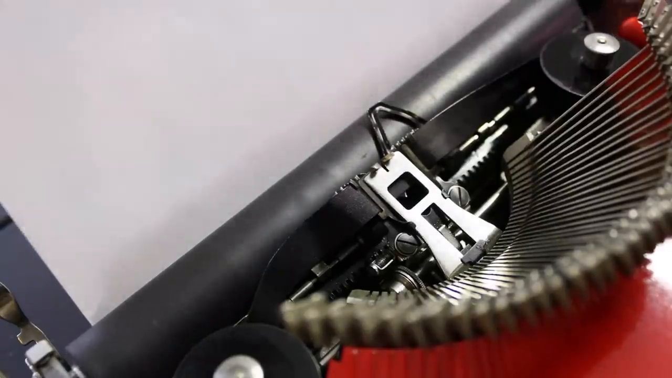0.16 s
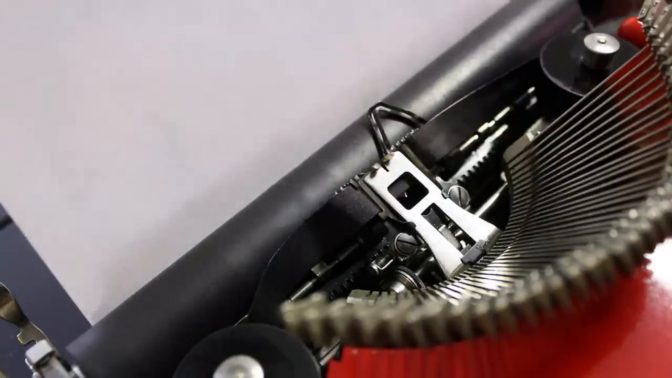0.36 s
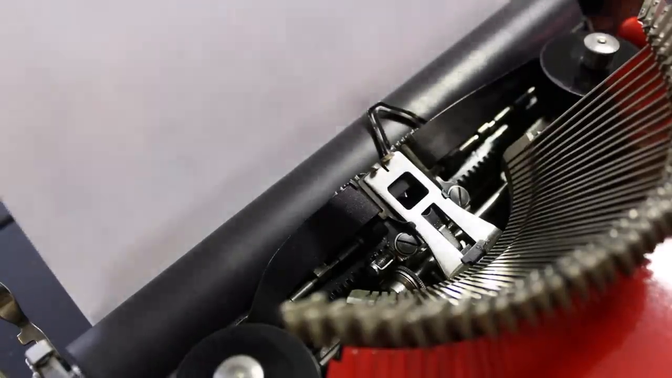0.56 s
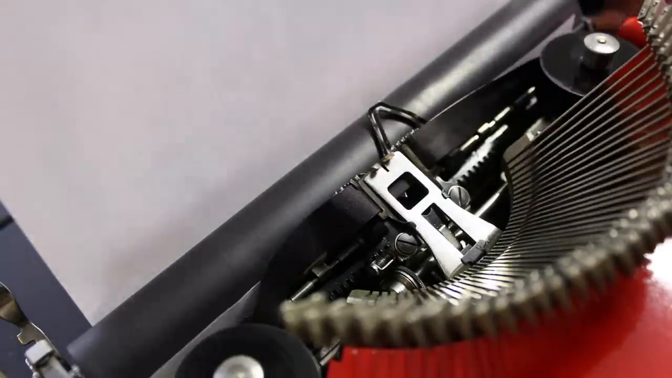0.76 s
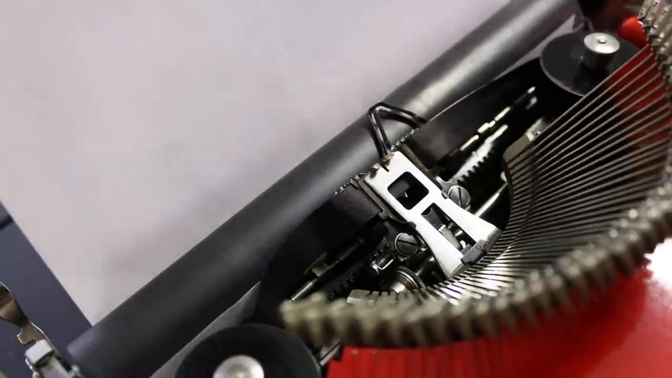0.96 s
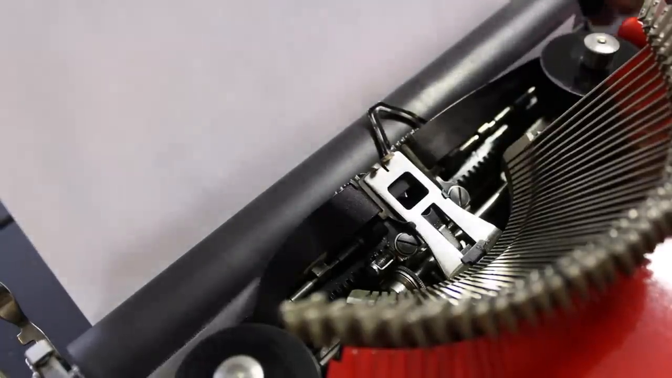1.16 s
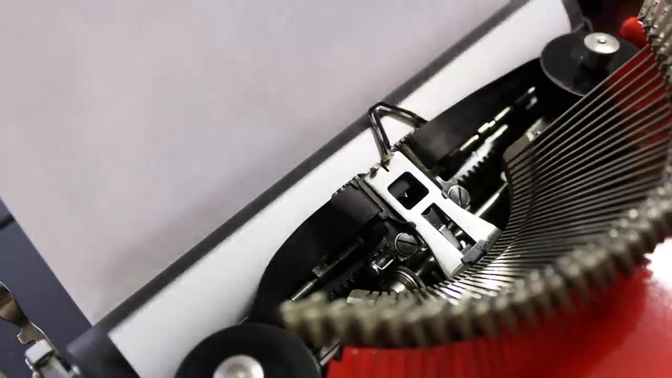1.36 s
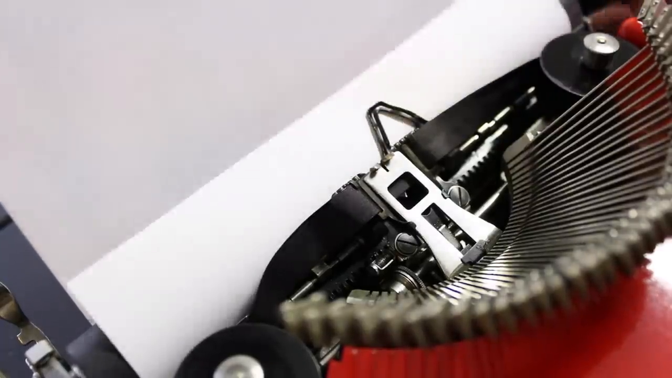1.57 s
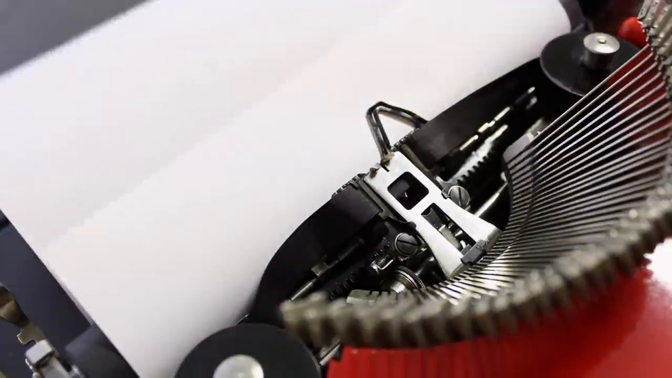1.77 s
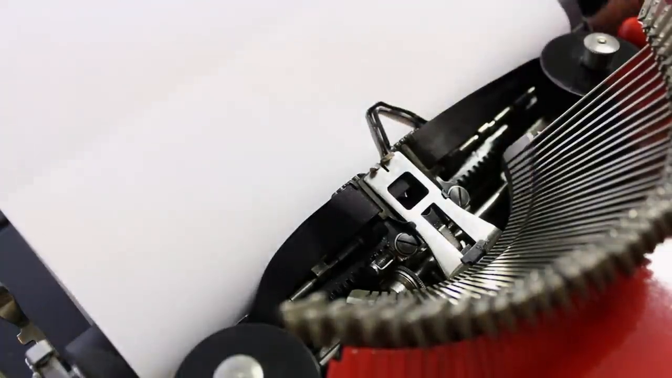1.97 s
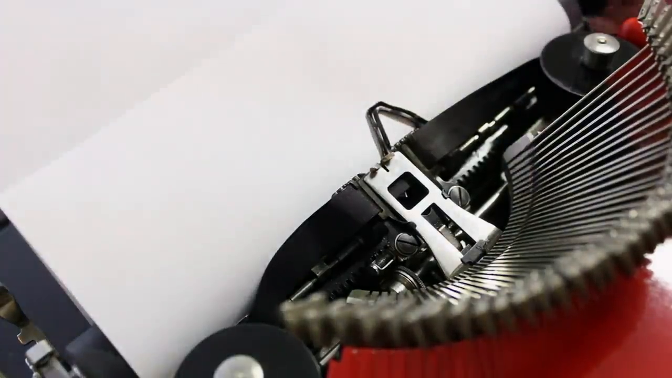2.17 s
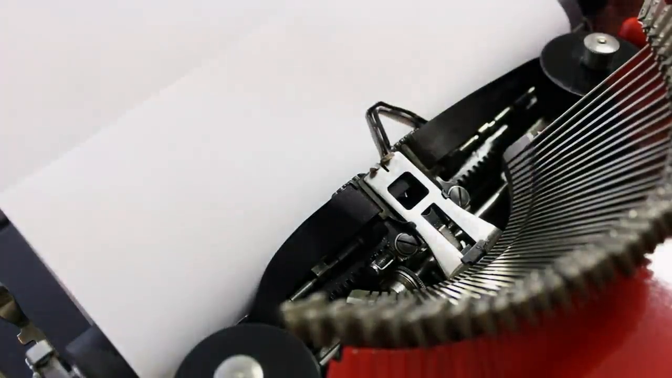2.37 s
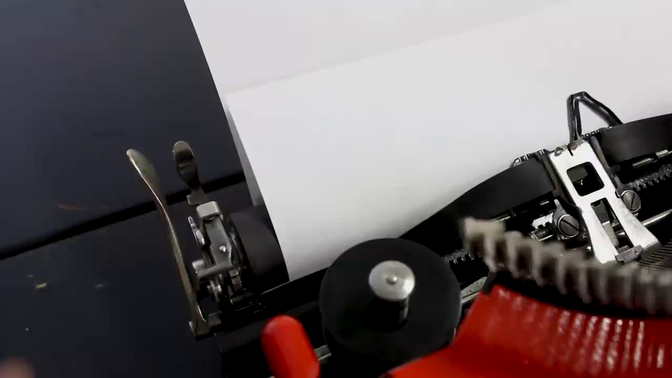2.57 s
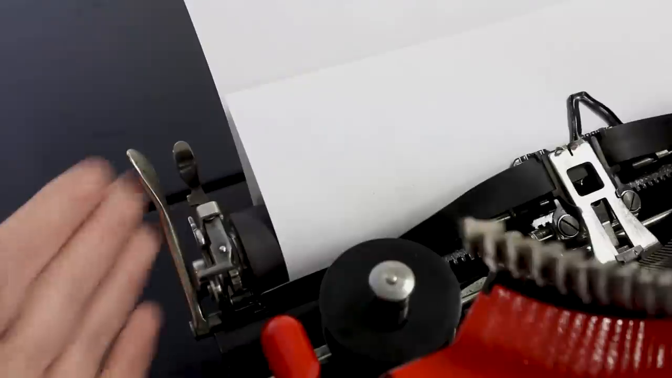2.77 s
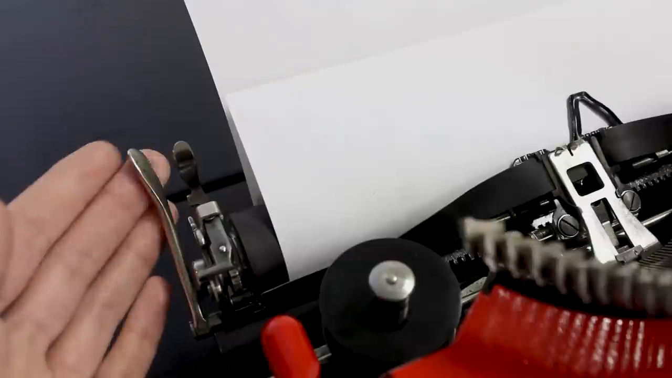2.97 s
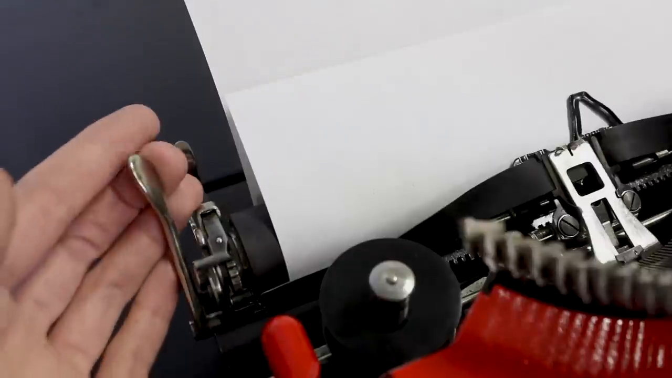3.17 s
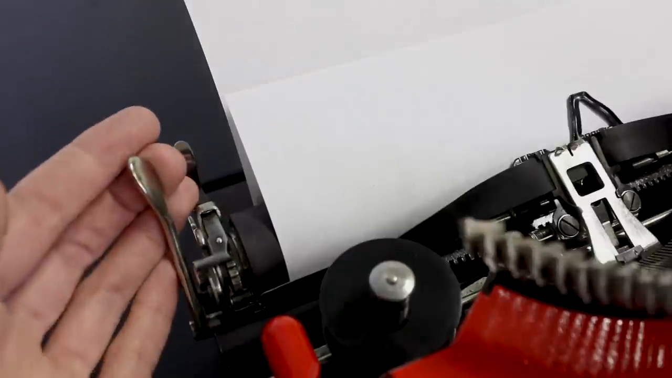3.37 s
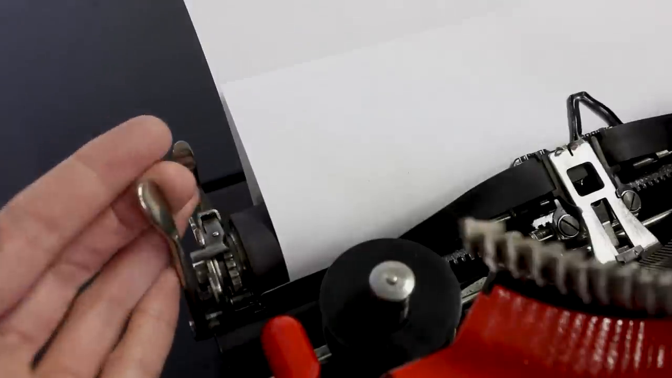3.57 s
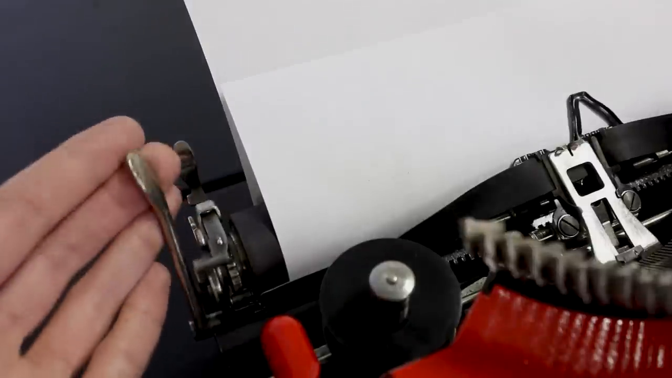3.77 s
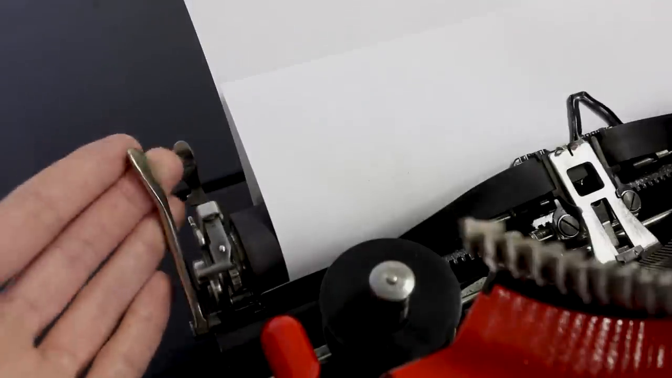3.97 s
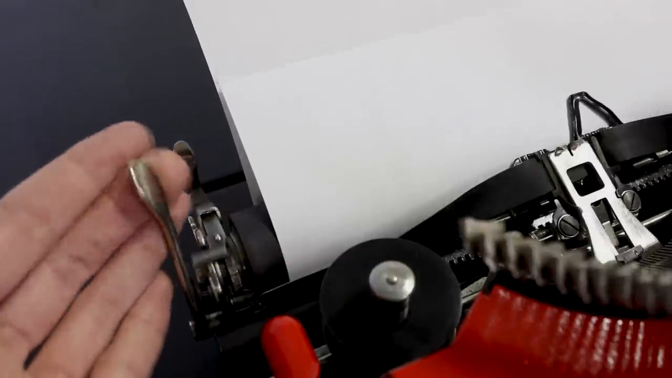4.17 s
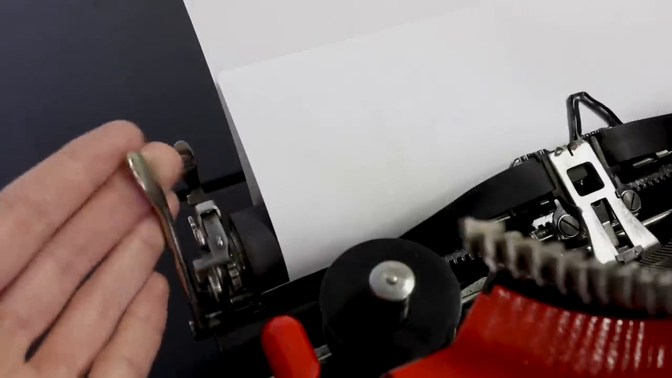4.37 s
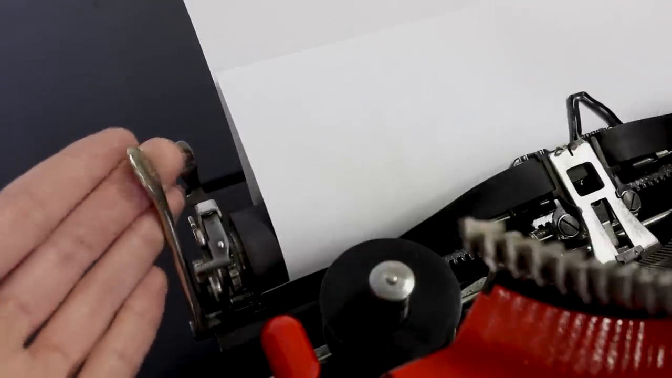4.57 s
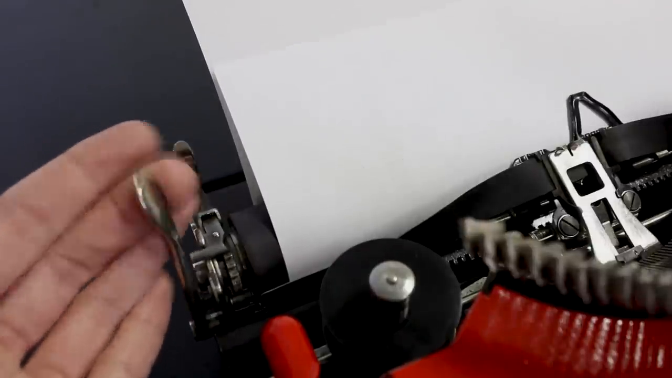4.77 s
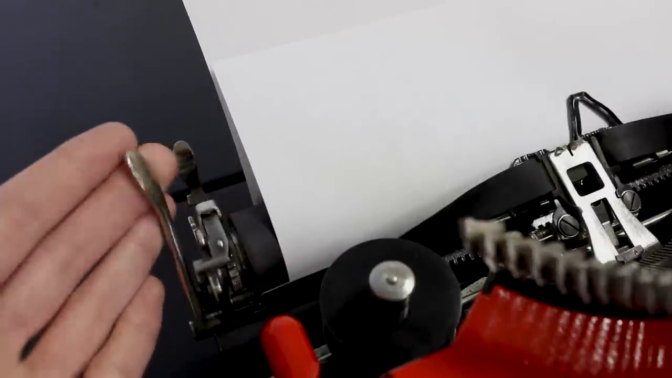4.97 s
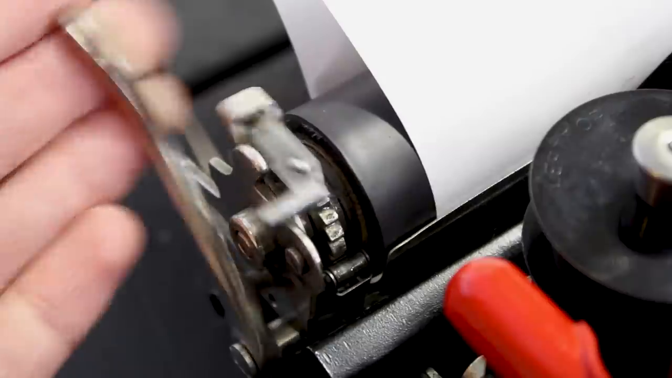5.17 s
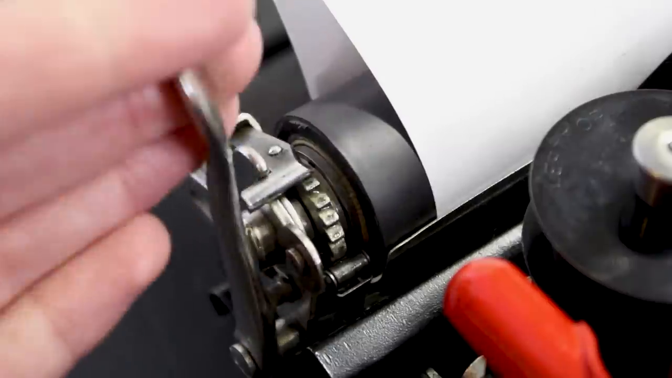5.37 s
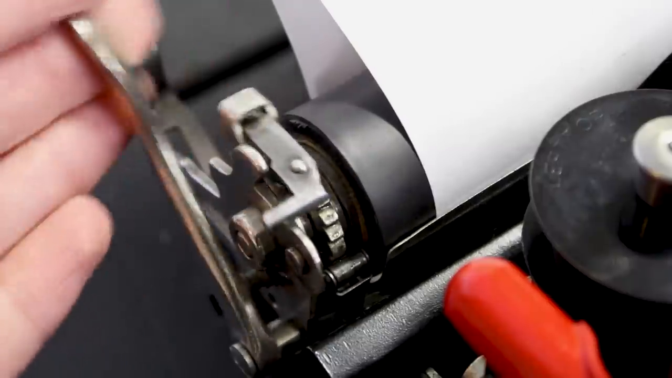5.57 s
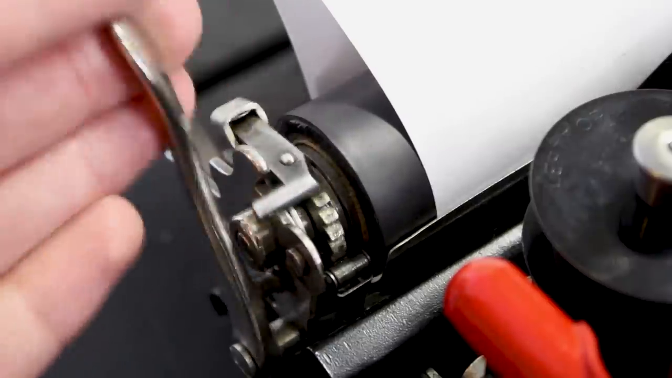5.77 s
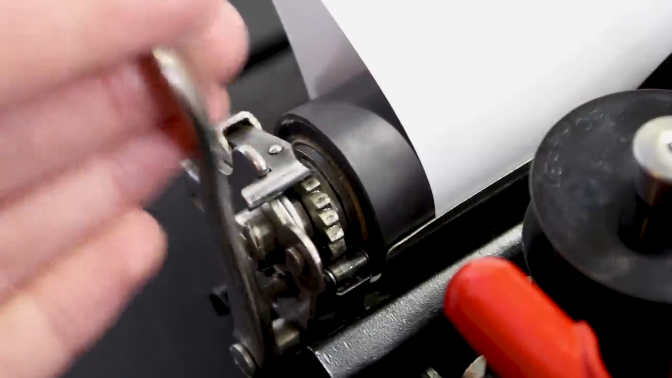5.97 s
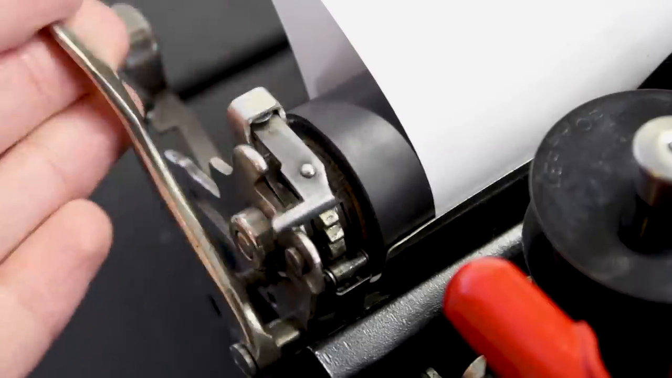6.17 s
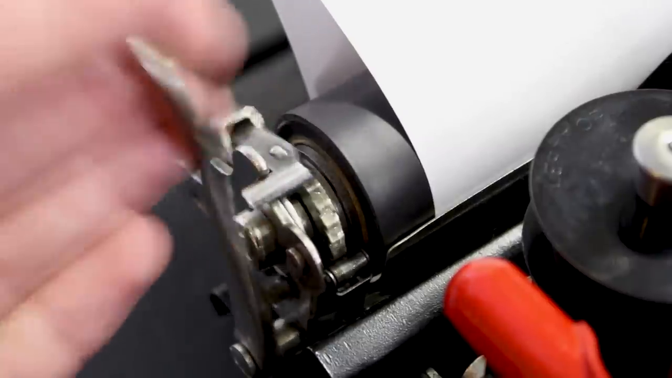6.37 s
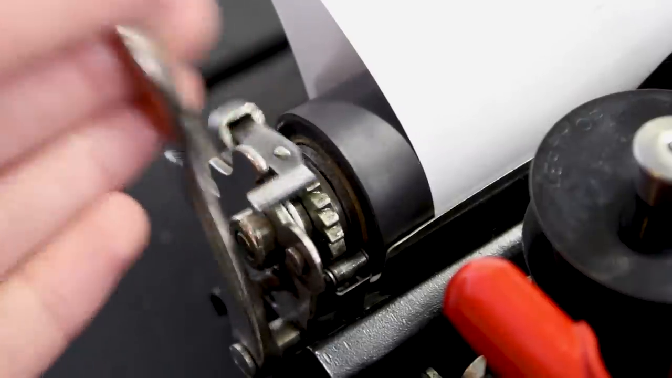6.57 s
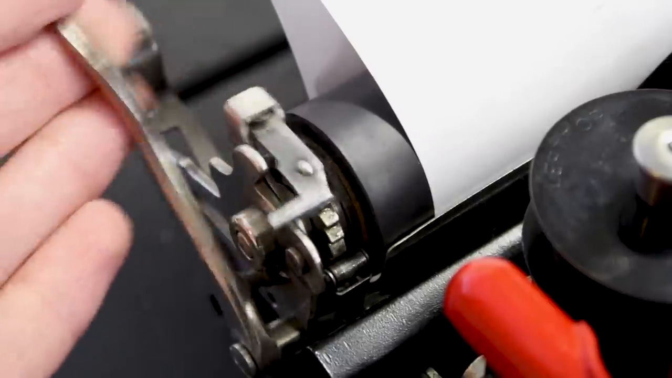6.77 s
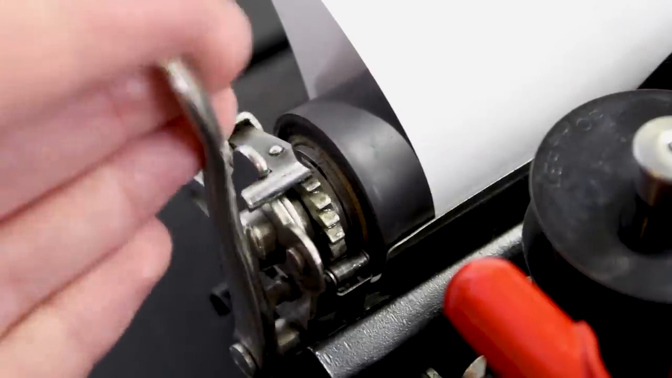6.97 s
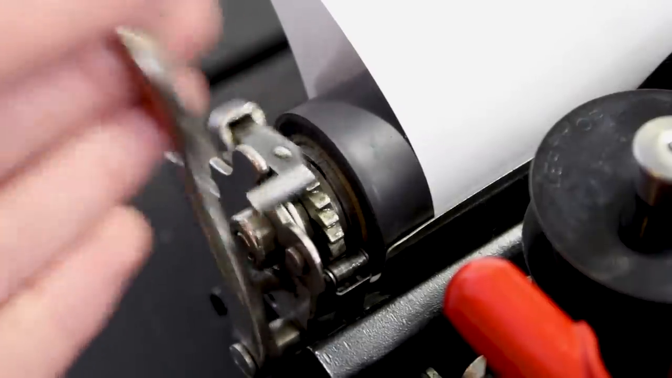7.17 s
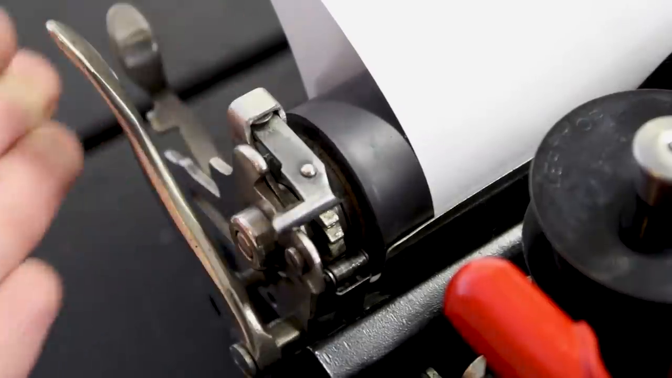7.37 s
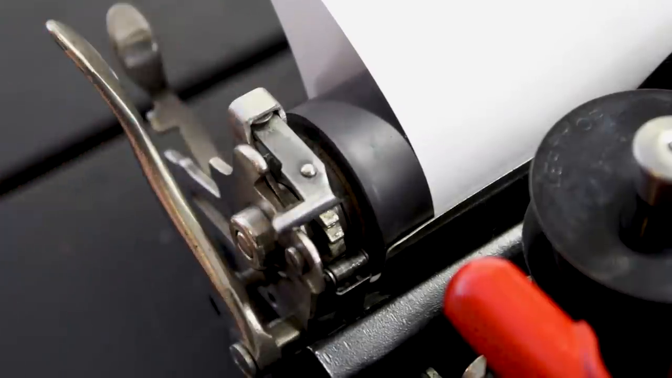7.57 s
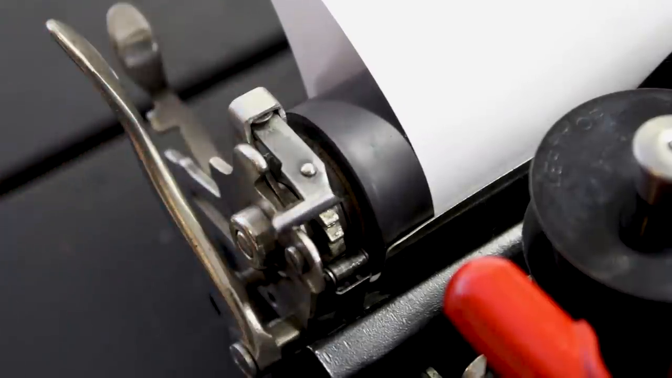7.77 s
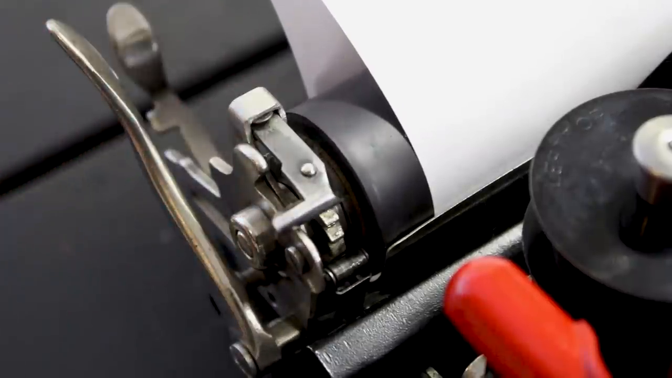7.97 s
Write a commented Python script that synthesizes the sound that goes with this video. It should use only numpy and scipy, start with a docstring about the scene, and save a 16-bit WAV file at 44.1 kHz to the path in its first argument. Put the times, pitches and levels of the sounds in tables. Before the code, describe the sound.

In a small quiet room, close to one microphone, a paper sheet rasps around a typewriter's rubber roller in short turns, with ratchet teeth clicking in quick bursts. After a brief lull, a hand works the line-space lever seven times: a sharp double-edged click, a dull stop, then a bright snap on release. A soft brush of skin ends it.

```python
"""Paper and line-space lever on a portable typewriter

A small quiet room with a faint high whine, one microphone: a sheet rasps in under the feed rollers and
drags round the platen while the ratchet clicks over its teeth. Then a hand works the line-space lever:
the pawl snaps, the platen turns a notch, the lever springs back; a hand brushes away at the end.
Contacts ring damped frame modes, jolts swell slow desk and case modes, paper is grainy shaped noise."""
import sys
import numpy as np
from scipy import signal
from scipy.fft import irfft
from scipy.io import wavfile

SR = 44100
rng = np.random.default_rng(int(sys.argv[2]) if len(sys.argv) > 2 else 0)


def master_out(mix):
    """Clip the mix to full scale and print it as 16-bit PCM to the path in sys.argv[1]."""
    frames = np.transpose(np.atleast_2d(mix))
    ceiling = np.clip(frames, -1, 1)
    pcm = np.round(ceiling * 32767).astype(np.int16)
    wavfile.write(sys.argv[1], SR, pcm)


N = 354123   # length [samples]


def amp(db):
    """Decibels to gain."""
    return 10 ** (np.asarray(db) / 20)


def rms_one(x):
    """Scale to unit rms."""
    return x / np.sqrt(np.mean(x ** 2) + 1e-20)


def in_time(rows):
    """Columns of a curve table, drawn as straight lines with one value a sample."""
    s, *columns = np.transpose(rows)
    return [np.interp(np.arange(N) / SR, s, column) for column in columns]


def add(out, s, x):
    """Mix a short sound in at a time, cropped to the scene."""
    i = round(s * SR)
    x = x[max(-i, 0):N - i]
    start = max(i, 0)
    out[start:start + len(x)] += x


def grainy(spectrum, grains_per_s, spread_db, share):
    """Noise plus a power share of random slip grains, shaped by a spectrum; rms 1."""
    born = rng.random(N) < grains_per_s / SR
    size_db = spread_db * np.minimum(rng.exponential(1, N), 4)
    grains = born * amp(size_db) * rng.choice([-1, 1], N)
    share = np.clip(share, 0, 1)
    raw = np.sqrt(1 - share) * rng.standard_normal(N) + np.sqrt(share) * rms_one(grains)
    hz, level_db = np.transpose(spectrum)
    bins_hz = np.maximum(np.arange(2049) * SR / 4096, 1)
    shape = amp(np.interp(np.log(bins_hz), np.log(hz), level_db, left=-90, right=-90))
    taps = np.roll(irfft(shape), 2048) * np.hanning(4096)
    return rms_one(signal.fftconvolve(raw, taps, "same"))


def fading(s, level_db, fade_s, before=False):
    """Gain that jumps at each time and fades away exponentially, or grows up to it."""
    jumps = np.zeros(N)
    np.add.at(jumps, (s * SR).astype(int), amp(level_db))
    step = -1 if before else 1   # growth is a fade run backwards
    return signal.lfilter([1], [1, -np.exp(-1 / (fade_s * SR))], jumps[::step] + 1e-18)[::step]


def swells(times, levels_db, modes, scatter_db):
    """Each jolt makes slow modes swell and die away."""
    out, t = np.zeros(N), np.arange(round(0.4 * SR)) / SR
    chance = rng.standard_normal((len(times), len(modes), 2))
    for s, jolt_db, draws in zip(times, levels_db, chance):
        for (hz, mode_db, swell_s), (phase, uneven) in zip(modes, draws):
            shape = (t / swell_s * np.exp(1 - t / swell_s)) ** 2   # peaks at swell_s
            level_db = jolt_db + mode_db + scatter_db * uneven
            add(out, s, amp(level_db) * shape * np.sin(2 * np.pi * (hz * t + phase)))
    return out


# room tone at the microphone: (frequency [Hz], relative density [dB per Hz])
AIR_SPECTRUM = [(15, -13), (25, 13), (108, -22), (161, -3), (416, -8), (451, -9.5), (531, 9), (734, -15),
                (1260, -2), (6380, -45), (7920, -46), (8590, -26), (12500, -36), (16000, -94)]


def air():
    """Room tone: even shaped noise without grains."""
    return amp(-69.5) * grainy(AIR_SPECTRUM, 100.0, spread_db=0, share=0)


# faint whine in the room: (time [s], level [dB rms])
WHINE_LEVEL = [(0, -85), (.4, -82), (.8, -69), (1.25, -72.5), (2.3, -77), (2.9, -78), (3.5, -72), (5, -115),
               (5.3, -87), (7.5, -102), (8.03, -86)]


def whine():
    """A thin tone of steady pitch high above the room noise, its level drifting."""
    level_db, = in_time(WHINE_LEVEL)
    return np.sqrt(2) * amp(level_db) * np.sin(2 * np.pi * 7840 * np.arange(N) / SR)


# Contacts at the machine, all levels relative:
# (time [s], peak [dB], dull body [dB], clack [dB], jolt into the desk [dB])
# the ratchet clicks over its teeth
TEETH_CONTACTS = [(0.0034, -38, -40, -32, -44.5), (0.0442, -19.5, -27, -36, -44),
                  (0.4834, -17.5, -31, -60, -49), (0.5342, -49, -38, -31, -64),
                  (0.5533, -13, -40, -39, -63), (0.563, -21, -37, -35, -58),
                  (0.6365, -18.5, -30.5, -24, -59), (0.6865, -16.5, -29, -20, -49),
                  (0.7004, -20, -32, -26, -44.5), (0.7421, -11.5, -40, -53, -51),
                  (1.2886, -15, -25, -38, -44.5), (1.3605, -13.5, -26, -28, -46),
                  (1.426, -19, -24.5, -22, -46), (1.5084, -16, -26.5, -23, -41.5),
                  (1.564, -15, -24, -9, -38.5), (1.6148, -10.5, -23, -57, -41),
                  (1.6425, -10.5, -16, -53, -35.5), (1.707, -18.5, -29, -64, -46),
                  (1.767, -10, -15.5, -34, -47), (1.8036, -12.5, -16, -30, -42),
                  (1.943, -10, -20.5, -30, -43.5), (1.9848, -10, -14.5, -19, -48),
                  (2.0079, -8.5, -16, -31, -38), (2.0293, -12.5, -17.5, -41, -41),
                  (2.0637, -18, -13, -23, -56)]
# light ticks of slack parts and fingers
TICK_CONTACTS = [(0.2035, -61, -36.5, -65, -60), (0.2398, -43, -43, -56, -56),
                 (0.2741, -59, -30.5, -41, -63), (0.2881, -53, -46, -53, -60), (0.315, -46, -48, -57, -74),
                 (0.4266, -28.5, -44, -60, -65), (1.2288, -47, -51, -39, -63), (1.257, -29, -54, -37, -64),
                 (2.3498, -46, -50, -65, -77), (2.498, -54, -51.5, -42, -73), (3.786, -39, -64, -61, -68),
                 (3.7983, -35.5, -46, -45, -81), (3.8222, -35.5, -50, -44, -82),
                 (3.9763, -41.5, -43, -45, -58), (4.0657, -30, -36, -53, -70),
                 (4.0718, -35, -30.5, -50, -63), (4.3976, -36, -62, -55, -66), (4.4298, -42, -48, -42, -78),
                 (4.647, -31, -36.5, -42, -74), (4.6559, -27.5, -33.5, -34, -57),
                 (4.98, -44, -50, -53, -69), (5.0164, -41, -55, -39, -74), (5.064, -43, -39, -43, -74),
                 (5.133, -24, -44.5, -42, -57), (5.557, -39.5, -53, -55, -70), (5.5692, -37, -44, -47, -66),
                 (6.068, -36, -45, -52, -67), (6.0955, -35, -45, -35, -72), (6.209, -41, -42.5, -59, -61),
                 (6.623, -39, -46, -70, -69), (6.6562, -39, -45, -41, -70), (6.7956, -51, -50, -69, -64),
                 (7.2234, -41, -52, -56, -76), (7.2406, -42, -50, -55, -80), (7.2585, -37, -48, -45, -66),
                 (7.3325, -13, -32.5, -43, -50.5)]
# the hand bumps case and desk
BUMP_CONTACTS = [(2.9265, -53, -55, -61, -46), (7.734, -29, -45, -54, -44), (7.7508, -35, -45.5, -52, -45)]
# the pushed lever's pawl first grazes a tooth
GRAZE_CONTACTS = [(3.2035, -13.5, -30, -31, -62), (4.1089, -10, -25, -27, -48),
                  (4.6729, -13, -27, -26, -53), (5.2672, -16, -24, -35, -48),
                  (5.8024, -16, -27.5, -14, -43), (6.3234, -12, -29, -26, -44), (6.895, -17, -29, -16, -55)]
# the pushed lever's pawl catches a tooth
CATCH_CONTACTS = [(3.235, -15.5, -29, -23.5, -49), (4.119, -13, -28.5, -32, -47.5),
                  (4.6859, -12.5, -31, -34, -49), (5.2798, -6, -20.5, -34, -41),
                  (5.8135, -10, -28.5, -10, -47.5), (6.3303, -10, -26, -26, -42),
                  (6.9047, -12, -28, -21, -41.5)]
# the platen has turned and the lever meets its stop
STOP_CONTACTS = [(3.5895, -14, -24.5, -40, -43), (4.2781, -17, -26, -52, -45),
                 (4.8565, -16, -23.5, -11.5, -39.5), (5.3513, -17, -18, -38, -40),
                 (5.894, -16.5, -22, -27.5, -41.5), (6.4601, -20.5, -28.5, -27, -42.5),
                 (7.042, -14.5, -25.5, -37, -41.5)]
# the released pawl snaps back
SNAP_CONTACTS = [(3.8594, -9.5, -37, -35, -65), (4.4606, -11, -38, -50, -66),
                 (5.0516, -10, -41.5, -52, -76), (5.623, -9, -34.5, -13, -70.5),
                 (6.1245, -10.5, -38, -42, -64.5), (6.687, -11, -35, -29, -67),
                 (7.2826, -5.5, -31, -41, -63)]
# how each kind touches, rows teeth, grazes, catches, stops, snaps, bumps, ticks:
# (0.6 kHz [dB over body], 1 kHz [dB over body], 2 kHz [dB over clack], 3.5 kHz [dB over peak],
#  7 kHz [dB over peak], scrape before it [dB], scrape length [s], chatter length [s])
KIND_TOUCH = [(-2.5, 2.5, -6.5, -13.5, -11, -18, 0.01, 0.004), (-9, -8, -23, -16.5, -20, -19, .009, .004),
              (-2, 0.5, 19.5, -16.5, -17, -22.5, 0.0054, 0.0046),
              (-39, -0.5, 14, -12, -11, -20, 0.0075, 0.0035),
              (-7, -4, 4.5, -17, -12.5, -25, 0.0088, 0.0034), (-6, 0, -2, -21, -13, -25, 0.013, .0043),
              (-4, -1, -13, -14, -19.5, -24.5, 0.0092, 0.0041)]
# what each kind sets off, same rows:
# (desk thump [dB over jolt], case hum [dB over jolt], rumble [dB over jolt], hollow knock [dB over body],
#  drag [dB over body], rustle after [dB over peak], rustle before [dB over peak])
KIND_SETS_OFF = [(1, -4.5, -46, -47, -29, -69, -55), (0.5, -8.5, -31.5, -19.5, -43, -49, -46),
                 (4, -7, -20.5, -7.5, -40, -44, -51), (2.5, -3.5, -11, -13.5, -20.5, -36.5, -17.5),
                 (3, 2.5, -12, -8, -27.5, -37.5, -56.5), (4, -14.5, -9.5, -1, -18, -37, -38),
                 (3, -6.5, -15.5, -9, -26.5, -29.5, -43.5)]


def each_contact():
    """Contact rows joined with the rules of their kind: (row, touch, sets off)."""
    tables = [TEETH_CONTACTS, GRAZE_CONTACTS, CATCH_CONTACTS, STOP_CONTACTS,
              SNAP_CONTACTS, BUMP_CONTACTS, TICK_CONTACTS]
    kinds = zip(tables, KIND_TOUCH, KIND_SETS_OFF)
    return [(row, touch, sets_off) for rows, touch, sets_off in kinds for row in rows]


def set_off():
    """Times, and the dB of thump, hum, rumble, knock, drag, rustle after and rustle before each contact."""
    rows = []
    for (s, peak_db, body_db, _, jolt_db), _, sets_off in each_contact():
        causes_db = np.repeat([jolt_db, body_db, peak_db], [3, 2, 2])
        rows.append((s, *(causes_db + sets_off)))
    return np.transpose(rows)


# spectra of sliding paper and shaken machine: (frequency [Hz], relative density [dB per Hz])
DRAG_SPECTRUM = [(180, -57), (300, -27), (504, -2.5), (547, 5.5), (594, 8), (751, 7.5), (1390, 2),
                 (2120, -4.5), (5000, -20.5), (6500, -19.5), (11000, -120)]
RUSTLE_SPECTRUM = [(880, -68), (1500, -26), (1920, -8), (2300, -1.5), (2740, -4), (3660, -2), (4550, -5.5),
                   (7690, -8), (11200, -27), (16000, -49)]
RUMBLE_SPECTRUM = [(15, -57), (25, -10.5), (81, -0.5), (113, -18.5), (141, 1.5), (198, -11), (231, -4.5),
                   (309, -14), (385, -8), (450, -14), (580, -43), (990, -120)]
# times to change by a factor e [s]
DRAG_FADE_S, RUSTLE_FADE_S, RUMBLE_FADE_S, RUN_UP_S = 0.059, 0.055, 0.071, 0.014
# the sheet slides round the platen in three turns of the knob, then the hand rests on the lever:
# (time [s], dull drag [dB], bright rustle [dB])
FEED_LEVEL = [(0.0, -37, -40.5), (.132, -51, -72), (.42, -76, -96), (.482, -45.5, -76), (.658, -38, -40),
              (.778, -40, -57), (.908, -43, -61.5), (1.008, -60.5, -69), (1.24, -64.5, -66.5),
              (1.43, -35.5, -45), (1.536, -56, -44.5), (1.666, -49, -52), (1.85, -65, -61),
              (2.0, -63, -36.5), (2.096, -43, -42.5), (2.29, -53.5, -63.5), (2.45, -65.5, -68.5),
              (3.03, -61, -65.5), (3.5, -63.5, -64), (3.75, -70, -85), (6.1, -67, -76), (6.24, -68, -57),
              (6.32, -68, -67), (7.4, -72.5, -79), (7.69, -56, -56.5), (8.03, -59.5, -62.5)]


def sliding():
    """Paper drags dull and gritty round the platen, rustle and lever rub are bright; contacts stir them."""
    drag_db, rustle_db = in_time(FEED_LEVEL)
    s, _, _, rumbles_db, _, drags_db, after_db, before_db = set_off()
    drag_gain = amp(drag_db) + fading(s, drags_db, DRAG_FADE_S)
    drag = drag_gain * grainy(DRAG_SPECTRUM, 900.0, spread_db=0.5, share=0.32)
    stirred = fading(s, after_db, RUSTLE_FADE_S) + fading(s, before_db, RUN_UP_S, before=True)
    rustle = (amp(rustle_db) + stirred) * grainy(RUSTLE_SPECTRUM, 2500.0, spread_db=2.5, share=0.14)
    shaken = amp(drag_db - 7.5) + fading(s, rumbles_db, RUMBLE_FADE_S)   # follows the feed drag
    rumble = shaken * grainy(RUMBLE_SPECTRUM, 100.0, spread_db=3.0, share=0.2)
    return drag + rustle + rumble


# the sheet is pulled in under the feed rollers, one list a pull: (time [s], relative level [dB])
RASP_PULLS = [
    [(0.0, -40), (0.04, -26.5), (0.076, -26.5), (0.186, -64), (0.276, -50), (0.41, -86)],
    [(0.47, -65), (0.5, -45), (0.628, -25), (0.69, -27), (0.926, -49.5), (0.974, -82)],
]
# (frequency [Hz], relative density [dB per Hz])
RASP_SPECTRUM = [(240, -36), (400, -10.5), (1210, 5.5), (2120, -4), (2650, -8), (3680, -23), (4170, -23),
                 (6460, -17), (8000, -29), (10400, -54), (17600, -120)]


def rasp():
    """Coarse slips of paper against rubber."""
    silence = (RASP_PULLS[-1][-1][0] + 0.05, -100)
    level_db, = in_time([*np.concatenate(RASP_PULLS), silence])
    return amp(level_db - 4.5) * grainy(RASP_SPECTRUM, 500.0, spread_db=0.0, share=0.72)


# corner frequencies of the contact colour [Hz]
CONTACT_COLOUR_HZ = [620, 1000, 1900, 3400, 7000]
# frame, platen and lever ring briefly: (frequency [Hz], width [Hz], relative level [dB])
FRAME_MODES = [(630, 84, -18), (814, 330, -7.5), (1057, 411, 2), (1394, 372, -3), (1411, 290, -2),
               (2240, 320, -21.5), (2530, 2600, -18), (3270, 837, 8.5), (4010, 460, 2), (4070, 255, -4),
               (4890, 740, 2), (5270, 420, -0.5), (5345, 410, -1.5), (6870, 1124, 4.5), (9240, 790, -28),
               (9260, 13000, -61), (11700, 8700, 8)]


def contacts(slips_per_s=1500.0, bounce_db=-16.0, bounce_s=0.0045, scatter_db=2.5):
    """Closing metal faces slip, chatter a few ms, bounce; all ring the frame (to microphone, all round)."""
    out, t = np.zeros((2, N)), np.arange(round(0.03 * SR)) / SR
    near = np.arange(-round(0.08 * SR), round(0.08 * SR)) / SR   # time around the contact [s]
    hz, width_hz, mode_db = np.transpose(FRAME_MODES)[:, :, None]
    events = each_contact()
    chance = rng.standard_normal((len(events), len(FRAME_MODES), 1))
    sides = (-1) ** np.arange(len(FRAME_MODES))[:, None]   # neighbouring modes move in opposition
    forces = rng.standard_normal((len(events), len(near)))
    slips = rng.random(forces.shape) < slips_per_s / SR
    bounces = amp(bounce_db) * np.exp(-np.abs(near) / bounce_s) * (near > 0)
    for (row, touch, _), uneven, force, slip in zip(events, chance, forces, slips):
        s, peak_db, body_db, clack_db, _ = row
        *over_db, scrape_db, scrape_s, chatter_s = touch
        colour_db = np.repeat([body_db, clack_db, peak_db], [2, 1, 2]) + over_db
        tilt_db = np.interp(np.log(hz), np.log(CONTACT_COLOUR_HZ), colour_db)
        level_db = mode_db + tilt_db + scatter_db * uneven
        rings = amp(level_db) * np.exp(-np.pi * width_hz * t) * np.sin(2 * np.pi * hz * t) * sides
        chatter = np.sin(np.pi * np.clip(near / max(chatter_s, 0.001), 0, 1))
        struck = signal.fftconvolve(rings, (chatter * force)[None, chatter > 1e-6], axes=1)
        # each mode keeps its energy through the chatter
        ring_size = np.linalg.norm(rings, axis=1, keepdims=True)
        struck *= ring_size / np.linalg.norm(struck, axis=1, keepdims=True)
        frame_ring = rings.sum(axis=0)
        add(out[0], s, struck.sum(axis=0))
        add(out[1], s, frame_ring)   # averaged over all directions the chatter leaves no notches
        closing = amp(scrape_db) * np.exp(-np.abs(near) / max(scrape_s, 0.002)) * (near < 0)
        scrape = signal.fftconvolve((closing + bounces) * force * slip, frame_ring)
        for direction in out:
            add(direction, s + near[0], scrape)
    # contacts are kept between about 560 and 10500 Hz
    band = signal.butter(4, [560, 10500], "band", fs=SR, output="sos")
    return amp(9.5) * signal.sosfilt(band, out)


def room(x, t60_s=0.29, level_db=-34.0, wall_cut_hz=4200):
    """Dense reflections at the microphone: noise that dies away, the treble first."""
    t = np.arange(round(0.6 * SR)) / SR
    white = rng.standard_normal(len(t))
    dull = signal.sosfilt(signal.butter(1, wall_cut_hz, fs=SR, output="sos"), white)
    bright = white - dull
    tail = dull * amp(-60 * t / t60_s) + bright * amp(-60 * t / (0.6 * t60_s))
    tail *= 1 - np.exp(-t / 0.0006)   # reflections build up within a few ms
    return signal.fftconvolve(x, tail * amp(level_db))[:N]


# desk under the machine, its case, and the lever arm's hollow knock on the case:
# (frequency [Hz], relative level [dB], time to swell [s])
DESK_MODES = [(86.8, -3, 0.024), (136.6, -6, 0.015)]
CASE_MODES = [(195, -2, 0.041), (269.8, -13.5, 0.025), (327, -9.5, 0.02), (390.3, -10, 0.036),
              (452.3, -14, 0.034)]
HOLLOW_MODES = [(568, -9, 0.013), (665, -5, 0.0084)]


def desk():
    """The jolt passes through case and feet into the desk; the lever arm knocks hollow on the case."""
    s, thump_db, hum_db, _, knock_db, *_ = set_off()
    thump = swells(s, thump_db, DESK_MODES, scatter_db=1.0)
    hum = swells(s, hum_db, CASE_MODES, scatter_db=2.0)
    knock = swells(s, knock_db, HOLLOW_MODES, scatter_db=2.0)
    return thump + hum + knock


# the hand brushes away over paper and case: (time [s], level [dB])
BRUSH_LEVEL = [(7.56, -72), (7.572, -89), (7.658, -54), (7.72, -57), (7.752, -38.5), (7.764, -52),
               (7.814, -58.5), (7.914, -43.5), (7.964, -69), (8.03, -57)]
# (frequency [Hz], relative density [dB per Hz])
BRUSH_SPECTRUM = [(590, -33), (1000, -23), (2530, -7), (2970, -3), (3760, -5), (5000, 4.5), (7690, 7),
                  (11200, -14), (15000, -48)]


def brush():
    """Skin on paper: bright, fine grains."""
    silence = (BRUSH_LEVEL[0][0] - 0.05, -100)
    level_db, = in_time([silence, *BRUSH_LEVEL])
    return amp(level_db) * grainy(BRUSH_SPECTRUM, 1400.0, spread_db=4.0, share=0.22)


def scene():
    """Machine, desk, hand, room and room tone at one microphone."""
    direct, all_round = contacts()
    machine = direct + room(all_round) + desk()
    paper = sliding() + rasp() + brush()
    return (machine + paper + air() + whine())[None]


def record(dry):
    """The loudest peaks are gently rounded, the top is cut steeply."""
    top = 0.6   # ceiling of the rounding, full scale 1
    rounded = top * np.tanh(dry / top)
    return signal.sosfilt(signal.cheby2(12, 70, 16600, fs=SR, output="sos"), rounded)


dry = scene()
out = record(dry)
master_out(out)
```